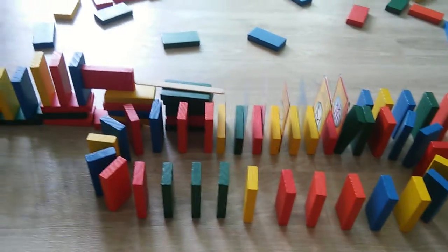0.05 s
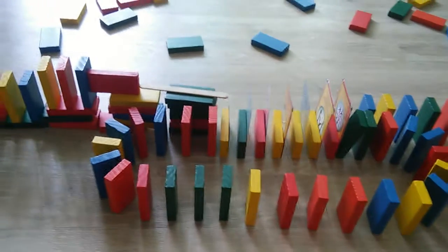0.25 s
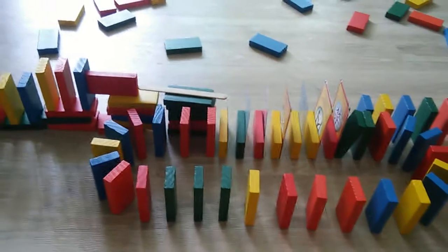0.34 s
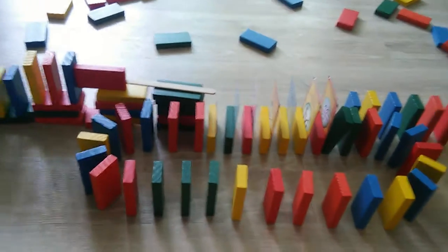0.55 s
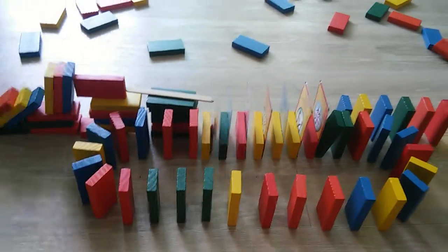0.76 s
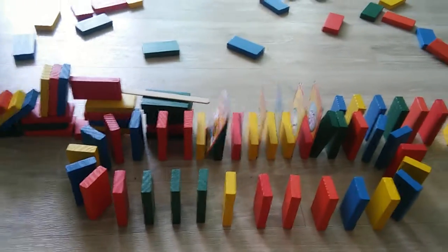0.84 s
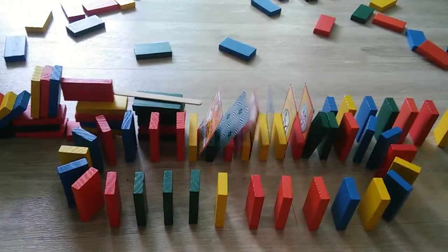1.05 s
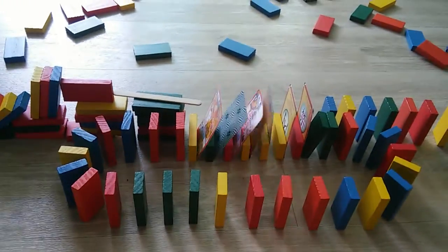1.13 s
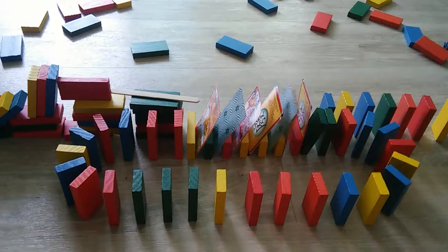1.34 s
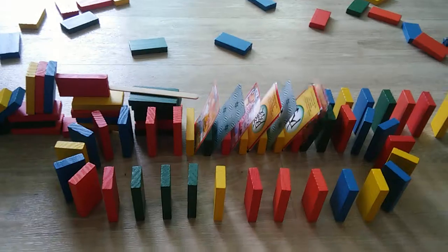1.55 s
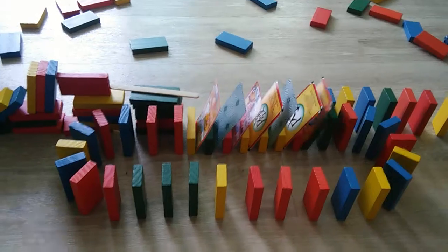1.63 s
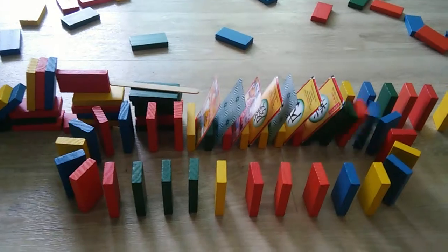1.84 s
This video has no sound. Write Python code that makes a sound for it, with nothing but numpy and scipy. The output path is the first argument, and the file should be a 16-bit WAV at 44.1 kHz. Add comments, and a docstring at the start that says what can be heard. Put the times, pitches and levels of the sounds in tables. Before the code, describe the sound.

Wooden dominoes topple close by in a quick run of sharp, bright clicks on a hard floor. The clatter thins out, light cards swish faintly as they fall, and one more click follows in a lively room.

```python
"""A lively room with a hard floor: a row of wooden dominoes topples close by.
Each knock is a sharp crack, a treble tick and three short block modes, smeared by the room into a
bright tail. The floor clacks and bumps; the loudest knock overloads the recorder with a thump and
a ping. After a second the fall passes through light cards, which swish and tick, then reaches the
next block. Faint rumble and hiss lie beneath."""
import sys
import numpy as np
from scipy import signal
from scipy.fft import rfft, irfft
from scipy.io import wavfile
from scipy.ndimage import uniform_filter1d, minimum_filter1d

SR = 44100
rng = np.random.default_rng(int(sys.argv[2]) if len(sys.argv) > 2 else 0)


def file_out(sig):
    """Save sig as 16-bit WAV at sys.argv[1]."""
    # one column per channel
    cols = np.atleast_2d(sig).T
    # limit, then scale
    lim = np.clip(cols, -1, 1)
    pcm = np.round(lim * 32767).astype(np.int16)
    wavfile.write(sys.argv[1], SR, pcm)


N = 83790
KNOCK_S, CONTACT_RISE_S, CONTACT_END_S = .06, .0006, .0015


def knocks():
    """Colliding pieces crack, tick and ring three modes; small jostles in the pile do not ring."""
    # Each row: start in seconds, low mode in Hz, its level in dB, middle mode level in dB,
    # high mode in Hz, its level in dB, crack level in dB, tick level in dB.
    hits = [(0.0095, 3250, -47, -52, 6310, -39, -44, -58), (0.1625, 3260, -24, -34, 6470, -34, -27.5, -47),
            (0.2161, 3130, -23, -35, 5700, -23.5, -27, -42),
            (0.2191, 3140, -17.5, -29, 5800, -29.5, -26.5, -38),
            (0.256, 3180, -10.5, -20.5, 5820, -11, -19.5, -36.5),
            (0.2892, 3100, -27, -25, 6530, -18, -21.5, -37),
            (0.2931, 3260, -24, -31, 5200, -27, -22.5, -49), (0.3344, 3170, -7.5, -7, 6383, -2, -9, -27.5),
            (0.3719, 3040, -8.5, -24, 6010, -13.5, -19, -29),
            (0.3744, 3170, -16, -7, 6210, -21.5, -14, -54),
            (0.399, 2840, -13, -14, 5880, -27, -20.5, -38.5),
            (0.402, 3446, -17, -12, 5710, -11, -13.5, -47.5),
            (0.4151, 3350, -12.5, -40, 6120, -16.5, -19, -41),
            (0.4805, 3600, -26.5, -25, 6140, -26, -26.5, -57),
            (0.4848, 3530, -8, -31, 6350, -11.5, -13, -39),
            (0.4892, 2760, -10.5, -12.5, 6300, -13.5, -39, -39),
            (0.505, 3360, -8, -12.5, 5960, -14, -14.5, -34.5),
            (0.5304, 2840, -19.5, -37, 5670, -22.5, -23.5, -37),
            (0.5331, 3400, -17.5, -13.5, 6200, -41.5, -25, -50),
            (0.5457, 2920, -32.5, -36, 5850, -31, -19.5, -50),
            (0.61, 3230, -31, -38, 5600, -38.5, -32, -45),
            (0.6796, 3470, -27, -23.5, 6200, -31.5, -29.5, -40.5),
            (0.684, 3260, -29.5, -50, 6110, -43.5, -28.5, -51),
            (0.7115, 3120, -34.5, -41, 6200, -29, -37, -62), (0.7333, 2640, -27, -28, 5920, -20, -29, -38),
            (0.7355, 2940, -28, -40, 5670, -27, -18.5, -48),
            (0.7563, 3370, -25.5, -22.5, 6140, -25, -27, -48),
            (0.7646, 3430, -25, -32, 6370, -16, -21.5, -41), (0.784, 3360, -34, -22, 5010, -26, -21, -54),
            (0.7959, 3086, -22, -27.5, 5733, -15.5, -15.5, -36),
            (0.852, 2820, -34.5, -49, 5850, -52.5, -38, -66),
            (0.972, 2775, -45, -63.5, 5620, -69.5, -46.5, -84),
            (1.244, 2880, -42.5, -66, 5760, -68.5, -66, -80.5),
            (1.8464, 2964, -34.5, -48, 5950, -37, -42.5, -58)]
    # Ring time in seconds of the low, middle and high mode.
    mode_t60_s = [.005, .006, .007]
    # Contact noises. Each row: frequency in Hz, relative density in dB.
    crack_spectrum = [(100, -25.5), (700, -42.5), (1400, -17.5), (2100, -4), (2700, 1.5), (3800, 4.5),
                      (4700, 6), (6600, 1.5), (7500, -17.5), (9300, -36.5)]
    tick_spectrum = [(4000, -29), (7500, -5.5), (9300, -12), (11600, 2), (14200, 0.5), (16000, -19)]
    # Brief extra rings on sharp knocks; the highest is the loudest knock's overload ping.
    # Each row: start in seconds, frequency in Hz, level in dB.
    extra_rings = [(.2192, 7070, -28), (.256, 6830, -16), (.335, 2630, -8), (.3356, 7950, -10.5)]
    middle_hz, middle_spread = 3973, .025
    crack_t60_s, tick_t60_s = .012, .013
    jostle_span_s, jostle_count = (.38, .56), 14
    out, t = np.zeros(N), np.arange(int(KNOCK_S * SR)) / SR
    crack_noise, tick_noise = noise(crack_spectrum), noise(tick_spectrum)

    def contact(crack_db, tick_db):
        crack = from_db(crack_db) * burst(t, crack_noise, crack_t60_s)
        tick = from_db(tick_db) * burst(t, tick_noise, tick_t60_s)
        return crack + tick

    for start_s, low_hz, low_db, middle_db, high_hz, high_db, crack_db, tick_db in hits:
        modes_hz = low_hz, middle_hz * (1 + middle_spread * rng.normal()), high_hz
        gains = from_db([low_db, middle_db, high_db])
        body = sum(gain * ring(t, hz, t60_s) for hz, gain, t60_s in zip(modes_hz, gains, mode_t60_s))
        add(out, start_s, body + contact(crack_db, tick_db))
    for start_s in rng.uniform(*jostle_span_s, jostle_count):
        add(out, start_s, contact(crack_db=-28, tick_db=-50))
    for start_s, hz, db in extra_rings:
        add(out, start_s, from_db(db) * ring(t, hz, t60_s=.005))
    return out


def contact_envelope(t, t60_s):
    """Builds up, holds while the contact lasts, then decays."""
    return np.minimum(t / CONTACT_RISE_S, 1) * decay(t - CONTACT_END_S, t60_s)


def ring(t, hz, t60_s):
    """A damped sine of random phase."""
    return contact_envelope(t, t60_s) * np.sin(2 * np.pi * (hz * t + rng.random()))


def burst(t, source, t60_s):
    """A random stretch of noise shaped by one contact."""
    return np.roll(source, rng.integers(N))[:len(t)] * contact_envelope(t, t60_s)


def landings():
    """Pieces landing flat excite the floor's dense middle resonances: a woody clack."""
    # Each row: start in seconds, level in dB.
    clacks = [(.335, -32), (0.3742, -37.5), (0.4012, -36), (0.487, -35), (.7340, -38.5), (0.7972, -37.5),
              (0.8532, -42)]
    # Each row: frequency in Hz, relative density in dB.
    floor_spectrum = [(120, -21.5), (450, -2.5), (700, -23.5), (1000, 4), (1500, 0.5), (2100, -8.5),
                      (3000, -25.5), (6000, -41.5)]
    envelope, t = np.zeros(N), np.arange(int(KNOCK_S * SR)) / SR
    shape = np.minimum(t / CONTACT_RISE_S, 1) * decay(t, t60_s=.028)
    for start_s, db in clacks:
        add(envelope, start_s, from_db(db) * shape)
    return envelope * noise(floor_spectrum)


def overload_thump():
    """Low thump of the recorder overloading on the loudest knock."""
    start_s, pulse_db, cutoff_hz = .3354, -22, 707
    out, t = np.zeros(N), np.arange(int(KNOCK_S * SR)) / SR
    pulse = from_db(pulse_db) * decay(t, t60_s=.0017)
    add(out, start_s, signal.lfilter(*signal.butter(1, cutoff_hz, fs=SR), pulse))
    return out


def floor_bumps():
    """Each soft bump swells and dies on one low floor resonance."""
    # Each row: start in seconds, frequency in Hz, level in dB.
    bumps = [(.058, 175.5, -47.5), (0.276, 168, -47.5), (.555, 178, -41), (0.597, 107, -49),
             (0.623, 170.4, -45), (0.937, 106.6, -45.5), (0.956, 195, -46.5), (1.273, 111.5, -56.5),
             (1.586, 102.8, -51.5)]
    rise_s = .013
    out, t = np.zeros(N), np.arange(N // 4) / SR
    shape = np.minimum(t / rise_s, 1) * decay(t - rise_s, t60_s=.11)
    for start_s, hz, db in bumps:
        add(out, start_s, from_db(db) * shape * np.sin(2 * np.pi * (hz * t + rng.random())))
    return out


def card_swish():
    """Cards slide over each other in three soft swells."""
    # Each row: time in seconds, level in dB.
    levels = [(1.12, -79), (1.26, -58), (1.39, -76.5), (1.425, -56.5), (1.53, -84), (1.65, -58.5),
              (1.72, -65.5), (1.81, -76.5)]
    # Each row: frequency in Hz, relative density in dB.
    spectrum = [(500, -16.5), (1700, -5.5), (3000, -3), (4500, 6), (6200, 3.5), (8500, -20.5),
                (13500, -21.5), (16000, -51)]
    return from_db(in_time(levels)) * noise(spectrum)


def floor_rub():
    """Pieces sliding on the floor rub dully."""
    # Each row: time in seconds, level in dB.
    levels = [(.76, -65.5), (.85, -59.5), (.99, -63), (1.1, -87), (1.19, -62), (1.33, -73), (1.43, -66),
              (1.54, -78.5), (1.66, -62), (1.81, -71)]
    # Each row: frequency in Hz, relative density in dB.
    spectrum = [(120, -13.5), (280, 2), (600, 0), (1100, -4), (1600, -12.5), (3000, -24.5), (8000, -35.5)]
    return from_db(in_time(levels)) * noise(spectrum)


def room(x):
    """Dense early reflections from floor and blocks, then a tail that dies band by band."""
    # Each row: frequency in Hz, reverberation time in seconds.
    tail_t60 = [(300, 1.15), (1300, 0.33), (3300, 0.33), (6000, 0.41), (12000, 0.46)]
    # Each row: frequency in Hz, relative level in dB.
    colour = [(300, 10), (1300, 8), (3300, 1), (6000, 1), (9000, 1), (14000, -0.5)]
    delay_s, early_db = .002, 4.5
    t, hz = np.arange(N) / SR, np.fft.rfftfreq(N, 1 / SR)
    white, response = rfft(rng.standard_normal(N)), np.zeros(N)
    early = from_db(early_db) * decay(t, t60_s=.016)
    edges_hz = np.geomspace(60, SR / 2, 15)
    for low_hz, high_hz in zip(edges_hz, edges_hz[1:]):
        centre_hz = np.sqrt(low_hz * high_hz)
        band = irfft(white * (hz >= low_hz) * (hz < high_hz), N)
        tail = decay(t, at_hz(tail_t60, centre_hz))
        response += band * from_db(at_hz(colour, centre_hz)) * (early + tail)
    response *= t > delay_s
    return signal.fftconvolve(x, response / np.linalg.norm(response))[:N]


def room_along_row(blocks, places=6, step_s=.04):
    """The travelling fall excites the room from different places: crossfaded responses, in a cycle."""
    # Each row: time in seconds, gain into the room in dB.
    send = [(.16, -3.5), (.26, -5), (.335, -8), (.40, -1), (.52, -5), (.68, -4.5), (.77, -2.5), (1.85, 4)]
    sent = blocks * from_db(in_time(send))
    out, position = np.zeros(N), np.arange(N) / SR / step_s
    for place in range(places):
        power_share = np.maximum(1 - np.abs((position - place) % places - 1), 0)
        out += room(sent * np.sqrt(power_share))
    return out


def background(each_db=-63):
    """Low room rumble and steady hiss."""
    # Each row: frequency in Hz, relative density in dB.
    rumble_spectrum = [(48, -35), (66, -1.5), (80, -11.5), (105, -1), (135, -4.5), (172, 2.5), (250, -5.5),
                       (400, -28.5), (900, -49)]
    hiss_spectrum = [(300, -2.5), (600, -5), (1100, -4), (1500, -15), (2400, -11), (2850, 1), (3500, -6),
                     (4600, -3.5), (6200, 1), (7200, -7.5), (8500, -26.5), (15000, -22.5)]
    return from_db(each_db) * (noise(rumble_spectrum) + noise(hiss_spectrum))


def from_db(db):
    """Decibels to gain."""
    return 10 ** (np.asarray(db) / 20)


def in_time(rows):
    """Interpolate (seconds, value) rows at every sample."""
    return np.interp(np.arange(N) / SR, *np.transpose(rows))


def at_hz(rows, hz):
    """Interpolate (Hz, value) rows on a log-frequency axis."""
    rows_hz, values = np.transpose(rows)
    return np.interp(np.log(np.maximum(hz, 1)), np.log(rows_hz), values)


def noise(spectrum):
    """Unit-rms noise coloured by (Hz, dB) rows."""
    gains = from_db(at_hz(spectrum, np.fft.rfftfreq(N, 1 / SR)))
    x = irfft(rfft(rng.standard_normal(N)) * gains, N)
    return x / np.sqrt(np.mean(x ** 2) + 1e-20)


def decay(t, t60_s):
    """One until time zero, then down 60 dB per t60_s."""
    return np.exp(-np.log(1000) * np.maximum(t, 0) / t60_s)


def add(out, start_s, sound):
    """Mix a sound in at start_s."""
    start = max(int(start_s * SR), 0)
    part = out[start:start + len(sound)]
    part += sound[:len(part)]


def scene():
    """Blocks with their reverberation, plus the softer sources dry; mono."""
    blocks = knocks() + landings()
    in_room = blocks + room_along_row(blocks)
    return (in_room + overload_thump() + floor_bumps() + card_swish() + floor_rub() + background())[None]


def record(dry):
    """Fast peak limiter, then a steep low-pass."""
    window_s, ceiling, cutoff_hz = .002, .93, 15800
    window = int(window_s * SR)
    needed_gain = np.minimum(1, ceiling / (np.abs(dry) + 1e-9))
    gain = uniform_filter1d(minimum_filter1d(needed_gain, window), window)
    lowpass = signal.ellip(10, .1, 90, cutoff_hz, fs=SR, output="sos")
    return signal.sosfilt(lowpass, dry * gain)


dry = scene()
out = record(dry)
file_out(out)
```